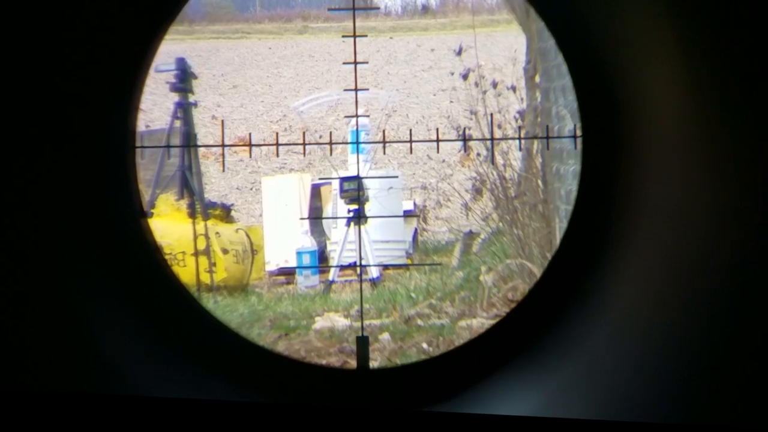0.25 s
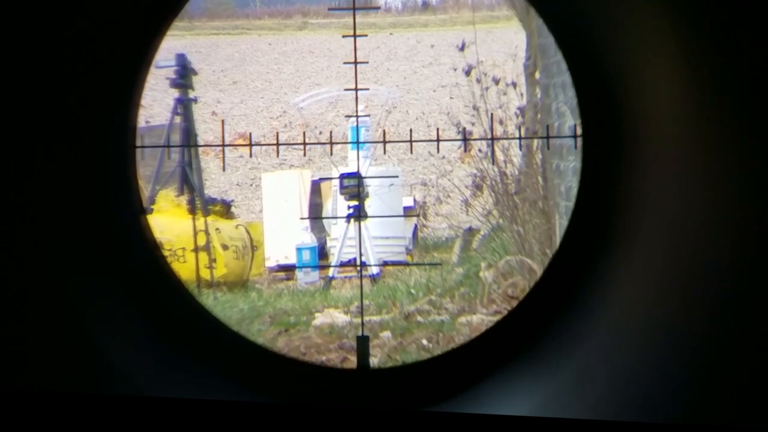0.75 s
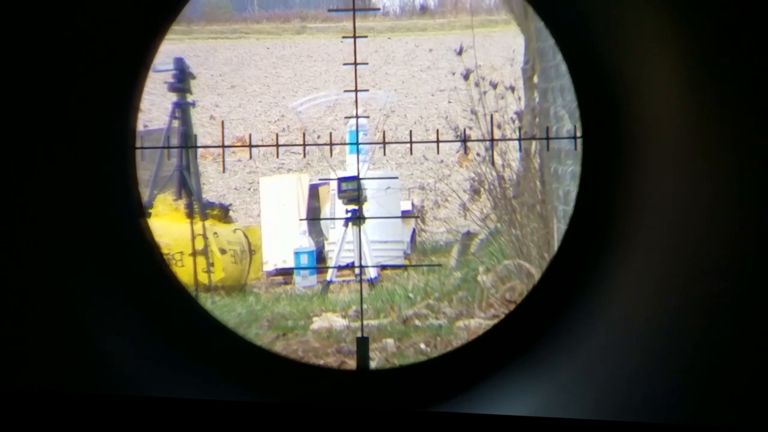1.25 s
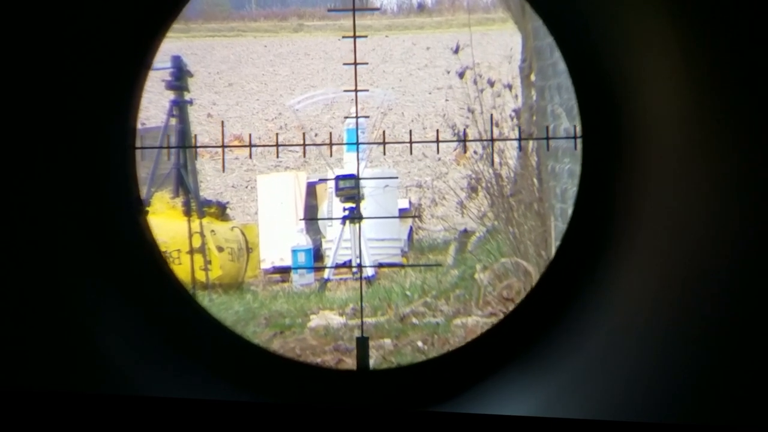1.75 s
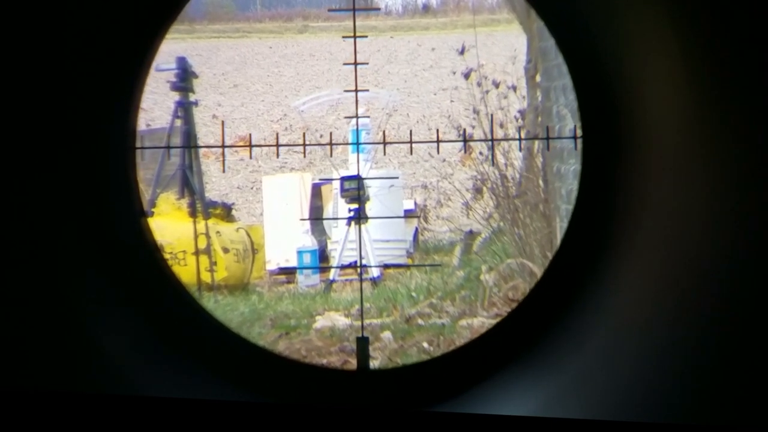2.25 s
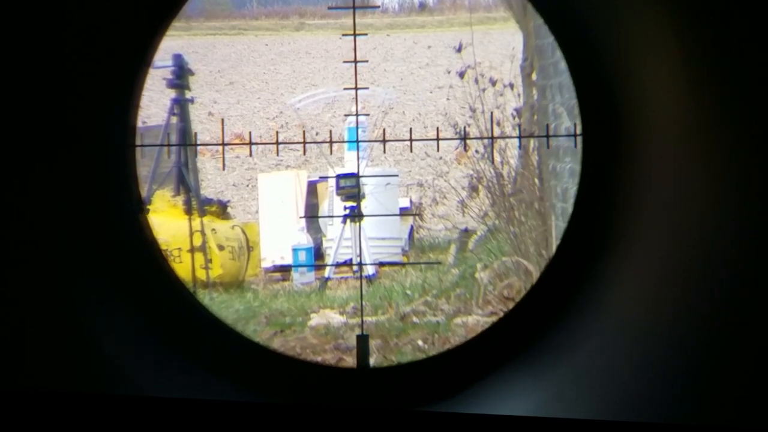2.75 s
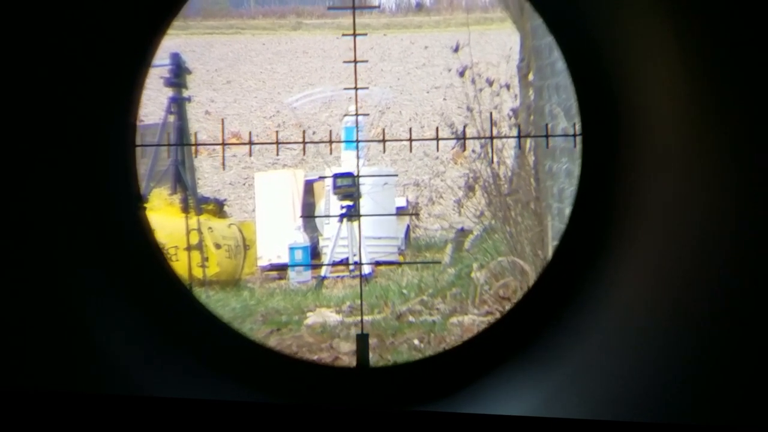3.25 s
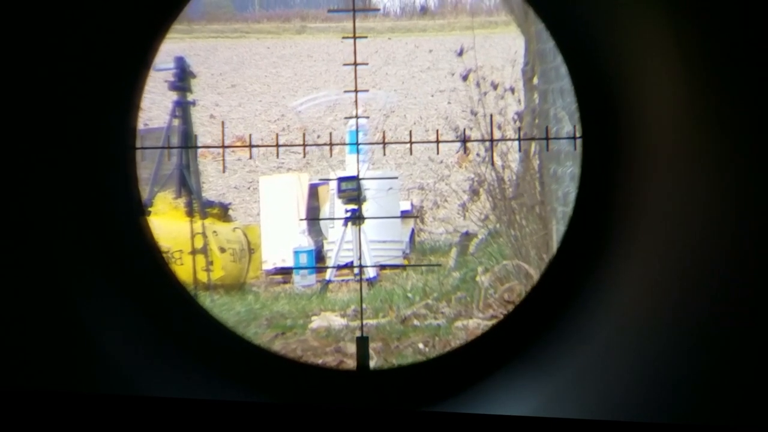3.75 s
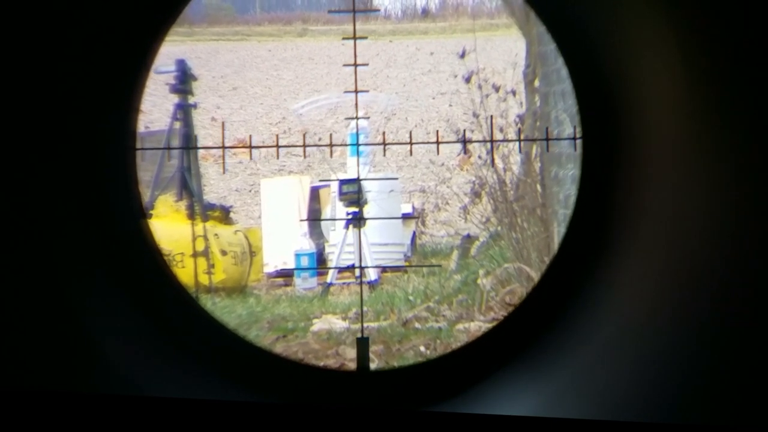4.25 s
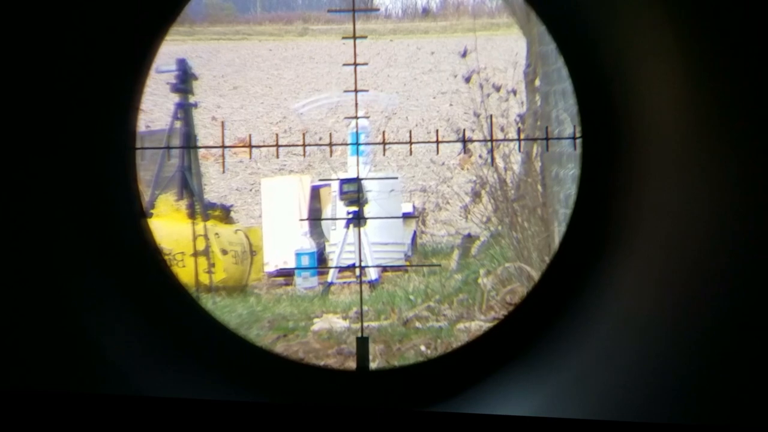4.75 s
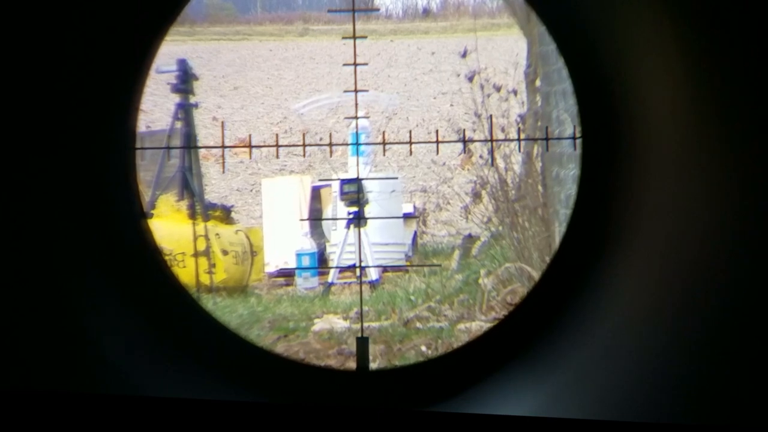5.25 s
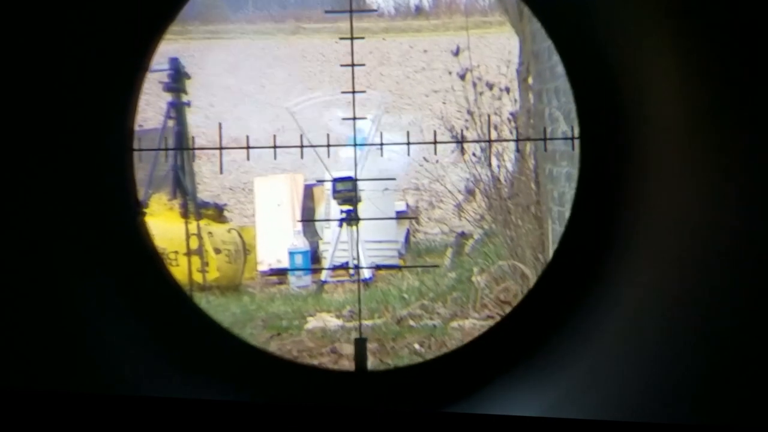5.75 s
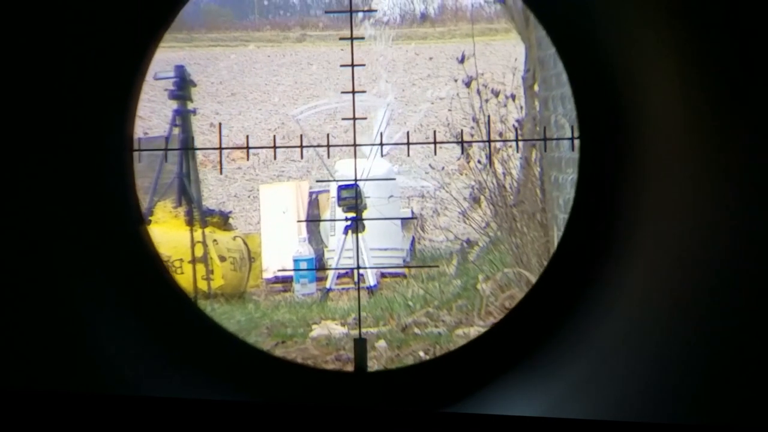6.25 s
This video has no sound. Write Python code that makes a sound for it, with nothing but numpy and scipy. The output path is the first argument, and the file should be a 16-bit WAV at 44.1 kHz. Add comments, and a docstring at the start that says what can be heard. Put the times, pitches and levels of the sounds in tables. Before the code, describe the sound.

In an open field, a distant engine drones steadily while light wind buffets the microphone and a few faint handling ticks come from an air rifle. After about five seconds the rifle fires once, very close: a loud, sharp blast with a hiss of air, rattling metal and a brief ring from the barrel. A small knock of the pellet hitting comes back, and the drone dips, then creeps in again.

```python
"""In a field, an air rifle is fired once; the microphone pair sits on the rifle itself.
A far piston engine drones on the harmonics of its cycle, wind buffets the ports, birds peep faintly.
The shot is a blast and a jet of air, with rattling metal, recoil and the barrel's ringing air column;
the pellet's hit sounds back. The report overloads the recorder, whose gain control ducks the whole
background and lets it creep back."""
import sys
import numpy as np
from scipy import signal
from scipy.fft import rfft, irfft
from scipy.io import wavfile
from scipy.ndimage import uniform_filter1d, minimum_filter1d

SR = 44100
rng = np.random.default_rng(int(sys.argv[2]) if len(sys.argv) > 2 else 0)


def wav_record(signal):
    """Record a signal, one row per channel, as 16-bit PCM in the file named by sys.argv[1]."""
    frames = np.transpose(np.atleast_2d(signal))
    bounded = np.clip(frames, -1, 1)
    # unit amplitude maps onto the largest positive 16-bit level
    quanta = np.round(bounded * 32767).astype(np.int16)
    wavfile.write(sys.argv[1], SR, quanta)


N = 286650

# Noise spectra. Each row: frequency in Hz, relative spectral density in dB.
HISS_SPECTRUM = [(880, -30), (1500, -0.5), (2070, -4.5), (2550, -5), (3040, -8), (4550, -12.5),
                 (9420, -17.5), (15100, -11), (15700, -13.5)]
EXHAUST_SPECTRUM = [(24, -53), (40, -22), (81, -11), (123, -17), (176, -4), (240, -18), (353, -6.5),
                    (552, -15), (695, -9), (947, -23.5), (1600, -40), (2080, -70.5), (3520, -120)]
RASP_SPECTRUM = [(600, -25), (800, 1), (1200, 1), (1450, -6), (2200, -17.5), (4000, -36.5)]
THUMP_SPECTRUM = [(24, -59), (40, -21), (194, -12.5), (310, -8), (490, -3), (640, -13), (800, -16),
                  (1100, -10.5), (1430, -37.5), (2420, -120)]
RATTLE_SPECTRUM = [(410, -39.5), (700, -6.5), (941, -10.5), (1040, -2), (1300, -4.5), (2100, -3.5),
                   (2500, -4.5), (3690, -12), (4300, -14.5), (6140, -19.5), (8000, -46.5), (10400, -66),
                   (17600, -120)]
JET_SPECTRUM = [(2940, -29), (5000, -5.5), (7500, -13), (8550, -7.5), (9540, -10.5), (12200, -4.5),
                (15300, -0.5), (15700, -8.5)]
# Bird notes. Each row: start in seconds, length in seconds, pitch in Hz, level in dB.
BIRD_NOTES = [(.66, .13, 5107, -80), (1.915, 0.0679, 4803, -78), (2.09, 0.0391, 6295, -81),
              (3.24, 0.0614, 6284, -81.5)]
# Gusts on the ports. Each row: time in seconds, level in dB.
GUSTS = [(0.0, -66), (1.6, -64.5), (2.12, -60), (2.26, -46.5), (2.42, -51), (2.62, -42.5), (2.76, -45),
         (2.9, -60), (3.12, -64), (3.25, -47), (3.4, -54), (4.0, -58), (4.45, -69), (5.1, -61), (5.3, -56),
         (6.5, -61.5)]
# Engine bands, drifting apart as the air bends the sound.
# Each row: time in seconds, then the levels of hum, third firing harmonic, growl, bark and rasp in dB.
ENGINE_BANDS = [(0.0, -48, -53, -52, -53, -68), (0.4, -48.5, -55, -52, -57, -68),
                (0.62, -46, -50.5, -47.5, -54, -67.5), (1.38, -49.5, -58, -52, -55.5, -68),
                (1.76, -45, -55, -45.5, -56, -66), (2.09, -44, -58, -46.5, -44.5, -60),
                (2.4, -44.5, -60, -50.5, -49.5, -69.5), (2.6, -45.5, -56, -48.5, -44.5, -68),
                (3.1, -41, -63, -48, -52.5, -66), (3.36, -40.5, -62, -46.5, -48, -64),
                (3.7, -44, -61, -49, -56, -67.5), (3.97, -41.5, -63, -48.5, -58, -68.5),
                (4.27, -44.5, -66, -51, -55, -68.5), (4.5, -42, -68, -44.5, -51, -61),
                (4.8, -40.5, -69, -45.5, -48, -68), (5.02, -45, -67, -54, -58, -70),
                (5.3, -52, -69, -47.5, -51, -70), (5.45, -47, -67, -49.5, -53, -64),
                (5.9, -42.5, -53, -44, -46, -62), (6.5, -48, -57, -41, -48, -61)]
# Engine speed. Each row: time in seconds, firings per second.
FIRING_RATE = [(0, 87.45), (.9, 87.15), (1.5, 87.35), (2.1, 87.75), (2.7, 87.35), (3.6, 87.5), (4.5, 86.98),
               (5.1, 87.08), (6.5, 87.3)]
# Engine balance. Each row: frequency in Hz, left minus right in dB.
ENGINE_BALANCE = [(100, 0.5), (350, -1.2), (430, 0), (520, 4), (610, 1.5), (700, 3.2), (1300, 5)]
# Tones on and between the firing harmonics. Each row: multiple of the cycle rate, relative level in dB.
FIRING_HARMONICS = [(4, -10), (8, 0), (12, -14.5), (16, -10), (20, -14), (24, -18.5), (28, -16.5),
                    (32, -15), (36, -25), (40, -27.5)]
BETWEEN_HARMONICS = [(1, -34), (5, -20), (13, -21), (15, -13), (19, -15), (25, -28), (31, -18), (35, -26),
                     (42, -37)]
# Knocks. Each row: start in seconds, peak in dB, pitch in Hz, nominal decay time in seconds,
# left minus right in dB.
HANDLING_TICKS = [(1.7814, -45.5, 3100, 0.035, .5), (2.2533, -54, 3009, 0.03, 4),
                  (2.9662, -52, 3700, 0.03, 1), (6.492, -47, 5990, .04, -14)]   # the rifle in the hands
VALVE_SLAMS = [(5.5105, -14, 6000, .03, 0), (5.5165, -5, 3034, 0.05395, -0.495),
               (5.5195, -7, 1994, 0.0639, 0.505), (5.538, -4, 1294, .05, 1.5), (5.549, -1.5, 2800, .06, .5),
               (5.608, -4.5, 2014, 0.0904, .5), (5.626, -7, 1896, 0.0475, 0.49)]   # hardest blows inside the action
PELLET_HIT = [(5.8095, -19, 3335.4, 0.029, -0.5), (5.8175, -21, 1750.6, 0.049, 10),
              (5.8176, -32, 13000, 0.006, 0), (5.817, -27, 240, 1.179, -1)]
# Envelope of the report; near echoes end at about 5.74 s and leave a far tail.
# Each row: time in seconds, thump level in dB, rattle and echo level in dB.
REPORT_ENVELOPE = [(5.5095, -55, -55), (5.512, -18, -19), (5.518, -5, -4), (5.53, -12, -4.5),
                   (5.56, -6, -1.5), (5.568, -10, -9.5), (5.6, -16, -12), (5.62, -14, -10),
                   (5.645, -17, -14), (5.725, -22, -17.5), (5.75, -31, -27), (5.86, -34, -39),
                   (6.0, -45, -47.5), (6.2, -66, -65)]
# Modes of the action and scope mount.
# Each row: frequency in Hz, relative level in dB, t60 in seconds, left-right correlation.
METAL_MODES = [(1016.9, 0.5, .1, -0.54), (1307.5, -3, 0.099, -0.51), (1890, -2, 0.077, -.3),
               (2013.4, -1, .08, -.3), (2477.2, -2, 0.11, .1), (2938.2, -1.5, .08, .1),
               (3064, -2.5, 0.073, 0.05), (3700, -12, 0.18, .1), (4440, -14, .45, .1), (4811, -10, .06, .1),
               (6090, -3.5, .025, .1)]
# Modes of the barrel's air column.
# Each row: frequency in Hz, level in dB, t60 in seconds, left minus right in dB.
BARREL_MODES = [(357, -4, 0.633, 6.5), (714.88, -17, 1.1, -1.5)]

TIME = np.arange(N) / SR
SHOT_S = REPORT_ENVELOPE[0][0]


def from_db(db):
    """Amplitude grows tenfold for every 20 dB."""
    return 10 ** (np.asarray(db) / 20)


def unit_rms(x):
    """Normalisation to a mean power of 1."""
    return x / np.sqrt(np.mean(x ** 2) + 1e-20)


def in_time(rows):
    """Linear interpolation turns each column into a curve over time."""
    s, *columns = np.transpose(rows)
    return [np.interp(TIME, s, column) for column in columns]


def at_hz(points, hz):
    """Interpolation of a spectrum on a logarithmic frequency axis."""
    frequencies, levels = np.transpose(points)
    return np.interp(np.log(hz), np.log(frequencies), levels)


def pan(x, pan_db):
    """A level difference, left minus right, gives a signal its direction."""
    return x * from_db(pan_db * np.array([[.5], [-.5]]))


def correlate(mid, side, correlation):
    """Sum and difference of independent signals give a pair of set correlation."""
    return np.sqrt(1 + correlation) * mid + np.sqrt(1 - correlation) * side * [[1], [-1]]


def drift(rate_hz):
    """Low-passed noise gives a random fluctuation of unit spread."""
    pole = np.exp(-2 * np.pi * rate_hz * 40 / SR)   # one step per 40 samples
    slow = signal.lfilter([1], [1, -2 * pole, pole * pole], rng.standard_normal(N // 40 + 2002))[2000:]
    return np.interp(np.arange(N) / 40, np.arange(len(slow)), unit_rms(slow - slow.mean()))


def coloured(spectrum, correlation, balance=((100, 0), (200, 0))):
    """Spectral shaping colours stereo noise of rms 1; balance pairs Hz with left minus right dB."""
    white = correlate(*rng.standard_normal((2, N)), correlation)
    hz = np.maximum(np.fft.rfftfreq(N, 1 / SR), 1)
    gain = pan(from_db(at_hz(spectrum, hz)), at_hz(balance, hz))
    return unit_rms(irfft(rfft(white) * gain, N))


def ring(force, hz, t60):
    """A damped resonator answers each impulse with a decaying sine."""
    r, w = from_db(-60 / (t60 * SR)), 2 * np.pi * hz / SR
    return signal.lfilter([0, np.sin(w)], [1, -2 * r * np.cos(w), r * r], force + 1e-18)


def hiss():
    """Stationary broadband noise forms a faint floor."""
    return from_db(-67) * coloured(HISS_SPECTRUM, correlation=.02)


def birds():
    """Amplitude modulation at 28 Hz gives thin, far notes their flutter."""
    out = np.zeros(N)
    for s, length, hz, level_db in BIRD_NOTES:
        gate = np.clip(np.minimum(TIME - s, s + length - TIME) / .008, 0, 1)
        flutter = 1 + .5 * np.sin(2 * np.pi * 28 * (TIME - s))
        out += from_db(level_db) * gate * flutter * np.sin(2 * np.pi * hz * TIME)
    return out


def wind():
    """Turbulent pressure is local, so each port has its own lumpy low noise."""
    buffet = coloured([(15, -8), (28, -6), (60, -8), (120, -1.5), (250, -8), (450, -23), (900, -58)],
                      correlation=.054)
    return from_db(in_time(GUSTS)[0] + 3.5 * np.array([drift(7), drift(7)])) * buffet


def harmonic_db(order):
    """Four firings a cycle reinforce every fourth harmonic; those half-way between are weakest."""
    if order % 4 == 0:
        return dict(FIRING_HARMONICS)[order]
    return np.interp(order, *np.transpose(BETWEEN_HARMONICS)) - 5 * (order % 2 == 0)


def engine(lag_s=.00012):
    """A periodic source radiates harmonics, each fading by itself; the firings modulate exhaust noise."""
    cycle_hz = in_time(FIRING_RATE)[0] / 4
    hum_db, third_db, growl_db, bark_db, rasp_db = in_time(ENGINE_BANDS)
    phase = 2 * np.pi * (np.cumsum(cycle_hz) / SR - cycle_hz[0] * .01)   # a cycle begins at 0.01 s
    slide_db = np.clip(1.1 * (TIME - 2.3), -2, 2)   # the bark's weight slides from harmonic 32 to 28
    low, hum, third, growl, bark = range(5)
    bands = np.zeros((5, 2, N))
    for order in range(1, 43):
        band = {8: hum, 12: third}.get(order, low if order < 14 else growl if order < 26 else bark)
        tilt = np.clip(30 - order, -2, 2) * (band == bark)
        scatter = order / 30   # higher tones scatter more on their way
        fade_db = 3.5 * np.clip(scatter, .5, 1) * (band != hum) * drift(3.2)
        # the tones keep loosely in step, so the cycle is heard as a pulse
        tone = np.cos(order * phase + 1.15 * rng.standard_normal() + 1.1 * scatter * drift(2.5))
        tone *= from_db(harmonic_db(order) + tilt * slide_db + fade_db)
        bands[band] += pan(tone, at_hz(ENGINE_BALANCE, order * cycle_hz[0]))
    levels_db = [-9 + (hum_db + growl_db) / 2, hum_db, third_db, growl_db, bark_db]
    tones = sum(from_db(level_db) * unit_rms(band) for level_db, band in zip(levels_db, bands))
    throb = 1 + .52 * np.cos(4 * phase) + .3 * np.cos(phase)
    rush_db = -4.5 + (growl_db + bark_db) / 2 + 2.2 * drift(9)
    rush = from_db(rush_db) * coloured(EXHAUST_SPECTRUM, correlation=.93, balance=ENGINE_BALANCE)
    rasp = from_db(rasp_db) * coloured(RASP_SPECTRUM, correlation=.23)
    left, right = tones + throb * (rush + rasp)
    return np.array([np.interp(TIME - lag_s, TIME, left), right])   # the left port hears it later


def knocks(rows):
    """Impact excitation: a 3 ms burst of noise drives one damped resonance and two lower ones."""
    out = np.zeros((2, N))
    for s, peak_db, hz, decay_s, pan_db in rows:
        burst, at = np.zeros(N), round(s * SR)
        burst[at:at + 130] = rng.standard_normal(130) * np.exp(-np.arange(130) * 7 / (decay_s * SR))
        body = ring(burst, hz, decay_s / 5)
        body += .55 * ring(burst, .55 * hz, decay_s / 4) + .3857 * ring(burst, .4 * hz, decay_s / 4)
        out += pan(from_db(peak_db) * body / np.abs(body).max(), pan_db)
    return out


def recoil(start_s=5.516):
    """Structure-borne sound: one heavily damped jolt passes through the mount."""
    impulse = from_db(-21) * (np.arange(N) == round(start_s * SR))
    return pan(ring(impulse, hz=60, t60=.0026), pan_db=5)


def barrel(start_s=5.545, swell_s=.012, blown_s=.04):
    """Pipe resonance: the air column rings once the pellet has left, louder while air still blows."""
    t = np.maximum(TIME - start_s, 0)
    blown_db = 6 * np.clip((blown_s - t) / .008, 0, 1)
    swell = (1 - np.exp(-t / swell_s)) * from_db(blown_db)
    return sum(pan(from_db(level_db - 60 * t / t60) * swell * np.sin(2 * np.pi * hz * t), pan_db)
               for hz, level_db, t60, pan_db in BARREL_MODES)


def metal(rattle_db, knocks_per_s=700, rest_s=5.73):
    """Modal vibration: loose parts strike each mode with random strength until the rifle is at rest."""
    start = round(SHOT_S * SR)
    shake = from_db(rattle_db[start:]) * (TIME[start:] < rest_s)
    hits = rng.random(len(shake)) < knocks_per_s / SR
    force = shake * hits * from_db(2.7 * np.minimum(rng.exponential(1, len(shake)), 3))
    out = np.zeros((2, N))
    for hz, level_db, t60, correlation in METAL_MODES:
        mid, side = ring(force * rng.standard_normal((2, len(shake))), hz, t60)
        build_up = np.sqrt(knocks_per_s * t60)   # overlapping rings add in power
        out[:, start:] += from_db(level_db - 4) / build_up * correlate(mid, side, correlation)
    return out


def air_jet(rattle_db, start_s=5.519, length_s=.031, rise_s=.004, fall_s=.003):
    """Jet noise: the valve opens, holds while the pressure sags, and shuts; the hiss echoes back."""
    t = TIME - start_s
    gate = np.clip(np.minimum(t / rise_s, 1 + (length_s - t) / fall_s), 0, 1)
    direct = gate * from_db(-2.5 - 4 * np.clip(t / length_s, 0, 2))
    echo = from_db(rattle_db - 11.5 - 24 * np.maximum(t, 0))   # the treble dies faster than the rattle
    air = coloured(JET_SPECTRUM, correlation=-.1, balance=((5000, -.5), (8000, -2.5), (15000, -1.5)))
    return np.hypot(direct, echo) * air


def report():
    """Superposition: hammer clack, muzzle blast and field echoes as noise, with the rifle's own sounds."""
    thump_db, rattle_db = in_time(REPORT_ENVELOPE)
    grit = from_db(2.6 * np.array([drift(160), drift(160)]) + 1.8 * drift(45))   # echoes arrive in clumps
    thump = from_db(thump_db) * coloured(THUMP_SPECTRUM, correlation=-.1,
                                         balance=((110, 4.5), (200, 0), (380, 4), (700, -.5)))
    rattle = from_db(rattle_db) * grit * coloured(RATTLE_SPECTRUM, correlation=-.1)
    blast = (TIME >= SHOT_S) * (thump + rattle + air_jet(rattle_db))
    return blast + metal(rattle_db) + barrel() + recoil()


def scene():
    """The pressures of all sources add linearly at the microphone pair."""
    background = hiss() + engine() + wind() + birds()
    return background + knocks(HANDLING_TICKS) + knocks(VALVE_SLAMS) + knocks(PELLET_HIT) + report()


def record(dry, threshold_db=-25, depth_db=15, attack_s=.025, hold_s=.406, release_db_per_s=39.5):
    """Automatic gain control ducks, holds and recovers; peaks that outrun it clip; the top is cut."""
    power = uniform_filter1d(np.mean(dry ** 2, axis=0), 220, origin=109)   # over the past 5 ms
    duck_db = np.clip(10 * np.log10(np.maximum(power, 1e-12)) - threshold_db, 0, depth_db)
    hold = round(hold_s * SR) // 2 * 2 + 1
    held_db = -minimum_filter1d(-duck_db, hold, origin=hold // 2)
    ramp_db = release_db_per_s * TIME
    released_db = np.maximum.accumulate(held_db + ramp_db) - ramp_db
    pole = np.exp(-1 / (attack_s * SR))
    gain = from_db(-signal.lfilter([1 - pole], [1, -pole], released_db))
    lowpass = signal.ellip(12, .3, 70, 15780, fs=SR, output="sos")
    return signal.sosfilt(lowpass, np.clip(dry * gain, -.9, .9))


dry = scene()
out = record(dry)
wav_record(out)
```